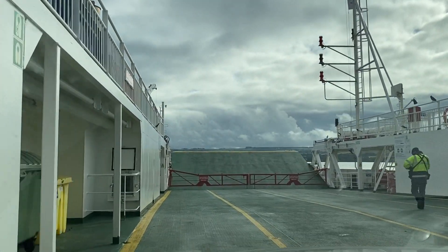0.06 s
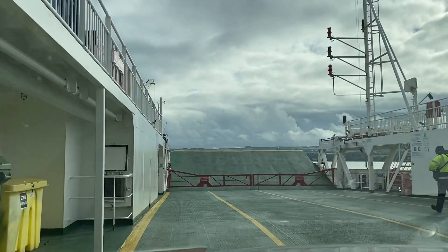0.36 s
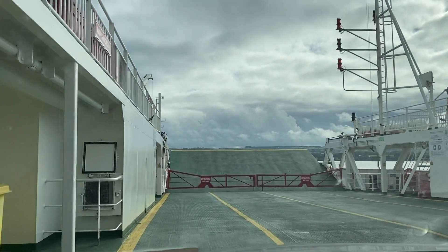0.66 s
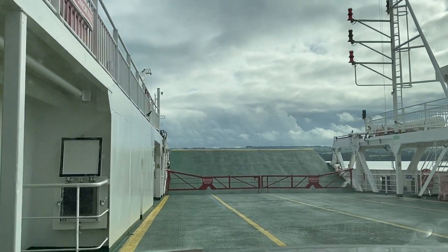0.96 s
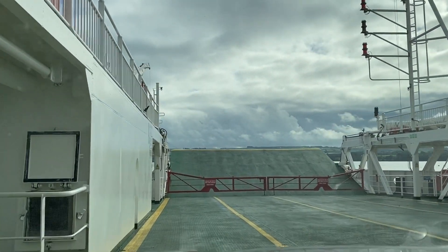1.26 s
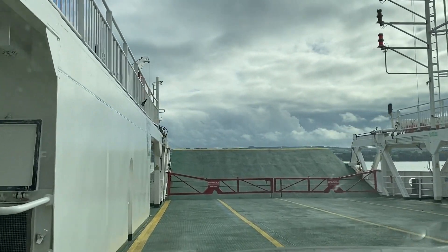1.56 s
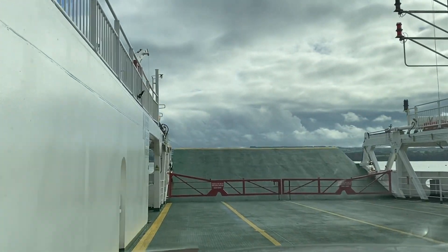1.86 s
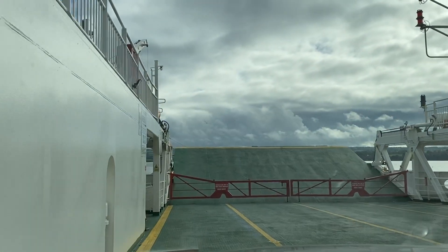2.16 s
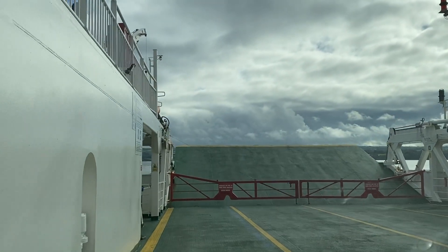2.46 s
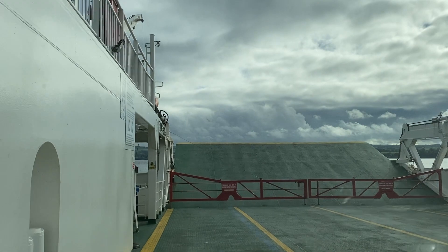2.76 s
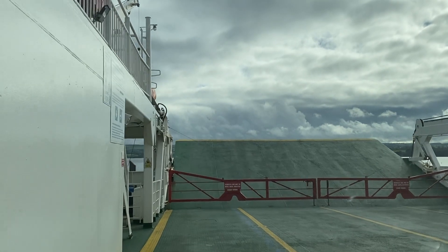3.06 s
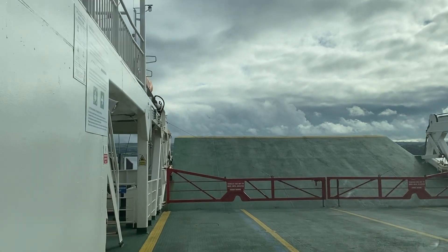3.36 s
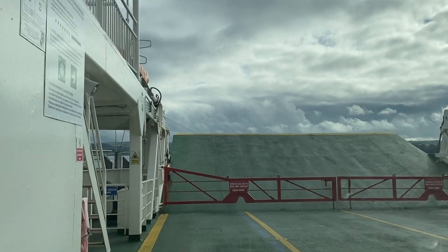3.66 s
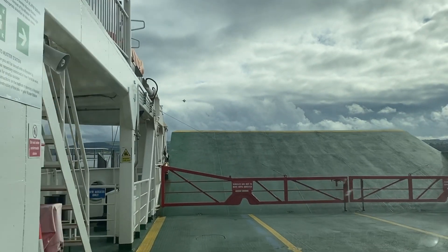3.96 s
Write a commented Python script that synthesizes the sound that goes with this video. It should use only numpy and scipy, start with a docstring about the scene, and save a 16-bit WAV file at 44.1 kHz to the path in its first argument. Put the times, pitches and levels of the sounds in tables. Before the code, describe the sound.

Deep ferry engine rumble heard inside a slowly rolling car, as a ventilator hums past.

```python
"""First comes a deep rumble and drone: a ferry's steel deck and diesels, heard inside a slowly rolling car.
The car's own engine sinks towards idle, under a soft hiss and a few faint notes that swell and fade.
A ventilator in the side wall draws near: its blade hum and rush of air swell, then drop away behind.
Something squeaks faintly twice, and the tyres thump softly over the plating."""
import sys
import numpy as np
from scipy.fft import rfft, irfft, next_fast_len
from scipy.io import wavfile
from scipy.ndimage import map_coordinates

SR = 44100
rng = np.random.default_rng(int(sys.argv[2]) if len(sys.argv) > 2 else 0)


def wav_out(sig):
    """Save sig, one row per channel (or a flat mono array), as 16-bit PCM at SR to the path in sys.argv[1]."""
    wavfile.write(sys.argv[1], SR, np.round(np.clip(np.atleast_2d(sig).T, -1, 1) * 32767).astype(np.int16))


N = 176400


def amp(db):
    """Turn decibels into a number to multiply by."""
    return 10 ** (np.asarray(db) / 20)


def unit(x):
    """Scale a signal to an average power of 1."""
    return x / np.sqrt(np.mean(x ** 2) + 1e-20)


def along(points, hz):
    """Read between (f/Hz, value) points, with octaves evenly spaced."""
    f, v = np.transpose(points)
    return np.interp(np.log(hz + 1), np.log(f + 1), v)


def clock():
    """The time of each sample in seconds."""
    return np.arange(N) / SR


def curves(rows):
    """Join timed rows with straight lines: one curve for each column after the time."""
    times, *columns = np.transpose(rows)
    return [np.interp(clock(), times, column) for column in columns]


def wobble(rate):
    """A smooth random curve through `rate` new values a second."""
    return map_coordinates(rng.standard_normal(256), [clock() * rate + 2], mode="wrap")


def tone(hz):
    """A pure note that follows a pitch curve."""
    return np.sqrt(2) * np.sin(2 * np.pi * (np.cumsum(hz) / SR + rng.random()))


def passing(at_s, before_s, after_s):
    """Sound weakens with distance: full at at_s, half power before_s earlier and after_s later."""
    t = clock() - at_s
    return 1 / np.hypot(1, t / np.where(t < 0, before_s, after_s))


def filtered(x, response):
    """Multiply each frequency in x by response(hz)."""
    size = next_fast_len(N + SR // 2)
    return irfft(rfft(x, size) * response(np.fft.rfftfreq(size, 1 / SR)), size)[..., :N]


# How alike the noise is on the left and right: f/Hz, likeness/0-1
LIKENESS = [(30, .99), (70, .95), (190, .95), (245, .64), (480, .78), (750, .64), (1200, .46), (2100, .47),
            (2600, .77), (7000, .82), (15000, .75)]
def noise(gain):
    """Stereo noise shaped by gain(hz): one part shared by both sides, one part opposite."""
    def shares(hz):
        angle = np.arccos(np.clip(along(LIKENESS, hz), -1, 1)) / 2
        return gain(hz) * np.array([np.cos(angle), np.sin(angle)])
    shared, opposite = filtered(rng.standard_normal((2, N)), shares)
    return np.sqrt(SR / 2) * np.array([shared + opposite, shared - opposite])


def rush(spectrum):
    """Steady noise from rows of f/Hz, level/dB; each level is for a slice 1 Hz wide."""
    return noise(lambda hz: amp(along(spectrum, hz)))


def swells(bands):
    """Bands of noise, each loudest at its own moment along the way."""
    out = np.zeros((2, N))
    for centre, width, db, at_s, fade_s in bands:
        band = unit(noise(lambda hz: 1 / (1 + ((hz - centre) / width) ** 2)))
        out += amp(db) * passing(at_s, fade_s, fade_s) * band
    return out


# The deck's deep rumble and the boom just above it: f/Hz, level/dB
RUMBLE_SPECTRUM = [(12, -79.5), (22, -66.5), (31, -46), (50, -42.5), (59, -40.5), (82, -40), (100, -51.5),
                   (140, -75.5), (250, -100), (500, -150)]
BOOM_SPECTRUM = [(50, -120), (100, -52), (125, -47.5), (145, -53.5), (168, -52), (205, -58), (250, -60),
                 (330, -77.5), (600, -110), (1000, -150)]
# How far each is turned up or down: t/s, gain/dB
RUMBLE_GAIN = [(0, -0.5), (.28, 2.5), (.5, 2), (.68, 3), (1.05, 0.5), (1.17, -7.5), (1.22, 0), (1.38, -4),
               (1.8, 1.5), (2.17, 1.5), (2.35, -3.5), (2.86, -1.5), (2.96, -2.5), (3.08, -4.5),
               (3.35, -6.5), (3.6, 0), (3.82, -9.5), (3.98, 1.5)]
BOOM_GAIN = [(0, -2), (.8, -2), (1.5, -0.5), (2.3, -1.5), (2.8, -0.5), (3.2, -2), (4, -2.5)]
def deck():
    """The steel deck rumbles and booms, and the tyres carry it up into the car."""
    rumble_db, = curves(RUMBLE_GAIN)
    boom_db, = curves(BOOM_GAIN)
    return amp(rumble_db) * rush(RUMBLE_SPECTRUM) + amp(boom_db) * rush(BOOM_SPECTRUM)


# The ship's engine notes: f/Hz, peak level/dB, peak t/s, time to half power/s, pitch wander/Hz
DIESEL_NOTES = [(27, -40, 1, 2.2, 0.8), (44.14, -26, 3.54, .8, 0.24), (63.2, -29, 0.29, 0.23, 1.5),
                (62.5, -28, 2.3, 0.14, 0.92), (79.3, -29, 1.3, 0.079, 0.69), (87.5, -24, 3.584, 0.11, 0.5),
                (121.8, -33.5, .15, 0.36, 2.44), (126.75, -39, 1.7, 1.2, 2.46)]
def diesels():
    """The ship's engines drone on low notes, each loudest at its own place along the deck."""
    return sum(amp(db) * passing(at_s, fade_s, fade_s) * tone(hz + wander * wobble(5.13))
               for hz, db, at_s, fade_s, wander in DIESEL_NOTES)


# The car's engine slowing down: t/s, firing f/Hz, level/dB
ENGINE_FIRING = [(0, 41.2, -22), (.5, 39.15, -28.5), (1.5, 37.7, -24), (2.2, 35.34, -27),
                 (2.7, 33.32, -27.5), (4, 32.97, -35)]
def car_engine():
    """The cylinders fire fast enough to make a low note, with a weaker one an octave up."""
    firing_hz, level_db = curves(ENGINE_FIRING)
    octave = amp(-11.5 + 2 * wobble(5)) * tone(2 * firing_hz)
    return amp(level_db) * (tone(firing_hz) + octave)


# The soft hiss in the car: f/Hz, level/dB
HISS_SPECTRUM = [(150, -74), (280, -65), (460, -73.5), (740, -74), (860, -77), (1100, -76.5), (1400, -85.5),
                 (1750, -81), (2100, -84.5), (2550, -86), (3200, -92.5), (4400, -95), (7000, -103),
                 (10000, -108), (16000, -115)]
# How far the hiss is turned up or down: t/s, gain/dB
HISS_GAIN = [(0, 2.5), (.1, -2), (.2, 1.1), (.45, 0.5), (.7, .3), (1.25, 1.5), (2.2, -4), (2.9, -2.5),
             (3.45, -2.5), (3.7, 0.2), (4, 0)]
# Narrow bands of noise: f/Hz, width/Hz, peak level/dB, peak t/s, time to half power/s
SWELLING_BANDS = [(167.8, 3.9, -37, 2.77, 0.66), (192, 48, -30, 2.3, .07), (229, 5.5, -42.5, 2.3, .7),
                  (272.6, 11, -41.5, 2.8, 0.3), (269, 6.9, -44, 1.08, 0.16), (402.1, 28, -47, 3.6, 0.38),
                  (412.8, 9, -45, 0.64, 0.13), (684, 30, -51.5, 3.26, 0.82)]
def hiss_and_swells():
    """Soft hiss, faint swelling notes, and a brief rough flutter around the fan's hum as it passes."""
    hiss_db, = curves(HISS_GAIN)
    return amp(hiss_db) * rush(HISS_SPECTRUM) + swells(SWELLING_BANDS)


# The hum of the fan blades: t/s, f/Hz, level/dB (before trim_db)
BLADE_HUM = [(0, 188.9, -41), (.33, 189, -32), (.63, 188.6, -29), (.72, 188.8, -40), (.88, 188.8, -25.5),
             (1.05, 187.7, -32.5), (1.11, 189.5, -36), (1.3, 187.8, -31), (1.68, 188, -22.5),
             (1.89, 188.3, -30), (1.99, 187.6, -20), (2.15, 187.6, -25), (2.29, 186.3, -16.5),
             (2.57, 185.2, -28), (2.64, 185.6, -21), (2.73, 183, -28.5), (2.84, 184.2, -27.5),
             (2.98, 184.8, -32.5), (3.12, 184, -27), (3.21, 185, -40.5), (3.38, 186.8, -23.5),
             (3.6, 184.3, -43.5), (4, 183.2, -36)]
# Higher notes heard close to the grille: multiple of the hum's pitch, peak level/dB
BLADE_OVERTONES = [(2, -46), (3, -38)]
def ventilator_hum(trim_db=-2, waver_db=1):
    """The blades hum; the car rolls through loud and quiet spots (standing waves) along the wall."""
    pitch, level_db = curves(BLADE_HUM)
    hum = amp(level_db + trim_db + waver_db * wobble(18)) * tone(pitch)
    overtones = sum(amp(db + 1.4 * wobble(6.84)) * tone(multiple * pitch + 3 * wobble(25))
                    for multiple, db in BLADE_OVERTONES)
    return hum + passing(at_s=2.08, before_s=.1, after_s=.1) ** 2 * overtones


# The duct's low roar and the air's high hiss: f/Hz, level/dB
DUCT_SPECTRUM = [(40, -150), (90, -85), (150, -58.5), (210, -63.5), (310, -66.5), (360, -58), (440, -65.5),
                 (540, -65.5), (780, -67.5), (1100, -70), (1500, -82), (2500, -110), (4000, -150)]
AIR_SPECTRUM = [(300, -150), (700, -100), (1400, -78), (2000, -72), (2550, -76.5), (3200, -80), (4000, -84),
                (5500, -89), (7200, -93), (10500, -99.5), (16000, -107)]
# Hiss the grille throws different ways: f/Hz, width/Hz, peak level/dB, peak t/s, time to half power/s
GRILLE_BEAMS = [(1740, 170, -53, 1.27, 0.3), (2650, 600, -50.5, 2.26, 0.088), (2400, 450, -52, 1.9, .15)]
def ventilator_air(flutter_db=.35):
    """Rushing air swells as the car nears the grille, then fades fast as the wall hides it."""
    roar = passing(at_s=2.23, before_s=.54, after_s=.22) * rush(DUCT_SPECTRUM)
    hiss = passing(at_s=2.223, before_s=.43, after_s=.2) * rush(AIR_SPECTRUM)
    hiss += swells(GRILLE_BEAMS)
    return roar + amp(flutter_db * wobble(11.78)) * hiss


# Two squeaks: t/s, half length/s, peak level/dB
SQUEAK_MOMENTS = [(0.3, .05, -68), (1.5, .02, -76)]
def squeaks(pitch_hz=12420, width_hz=130):
    """Faint, very high squeaks, probably from a dragging brake."""
    band = unit(noise(lambda hz: np.exp(-((hz - pitch_hz) / width_hz) ** 2)))
    loudness = sum(amp(db) * np.exp(-((clock() - at_s) / half_s) ** 2)
                   for at_s, half_s, db in SQUEAK_MOMENTS)
    return loudness * band


# Thuds from bumps in the deck: t/s, peak level/dB, f/Hz
DECK_BUMPS = [(1.192, -18.5, 78.4), (1.236, -11, 65.3), (1.474, -14, 55.3), (2.14, -19, 75.8),
              (2.939, -15.5, 64), (3.955, -14.5, 80)]
def tyre_thumps(rise_s=.012):
    """Each bump under the tyres gives the car's body a few soft, low shakes."""
    out = np.zeros(N)
    for start_s, db, hz in DECK_BUMPS:
        t = np.maximum(clock() - start_s, 0)
        rise_and_fade = t / rise_s * np.exp(1 - t / rise_s)
        out += amp(db) * rise_and_fade * np.sin(2 * np.pi * hz * t)
    return out


# Pitches made louder or softer by sound bouncing between the windows: f/Hz, width/Hz, gain/dB
WINDOW_COLOUR = [(456.5, 16, 4.5), (516, 26, 3), (599, 6.3, -1), (810, 11, 2.5), (920, 13, -1),
                 (960, 18, -4), (1150, 5.7, -8), (1200, 75, 0), (1426, 36, 3), (1428, 17, -3),
                 (1716, 120, 2), (2006, 60, -2.5), (2980, 110, -2), (3025, 26, 6), (3300, 28, 2.5),
                 (4240, 180, -2)]
def scene():
    """All the sounds together, coloured by the cabin as heard behind the windscreen."""
    def colour(hz):
        return amp(sum(db * np.exp(-((hz - centre) / width) ** 2)
                       for centre, width, db in WINDOW_COLOUR))
    ventilator = ventilator_hum() + ventilator_air()
    mix = deck() + diesels() + car_engine() + hiss_and_swells() + ventilator + squeaks() + tyre_thumps()
    return filtered(mix, colour)


# How much louder the left side is than the right: f/Hz, gain/dB
LEFT_GAIN = [(60, 0.5), (200, -.5), (400, 1), (600, 4.5), (720, 2), (1150, -1), (1400, -3.5), (2300, -0.7),
             (3200, 3.5), (5200, 2), (7000, 0)]
# How far the left wave runs ahead of the right: f/Hz, phase/radians
LEFT_LEAD = [(30, -.15), (60, -.22), (110, -.1), (200, .4), (300, .8), (400, 1.7), (700, 2.0), (1000, 2.35),
             (1650, 2.6), (2400, 6.2), (3000, 7), (4500, 6.45), (5300, 6.7), (7000, 6.2), (11000, 0),
             (15000, -6.2)]
def record(dry, top_hz=15750):
    """Stereo spread: left and right differ in level and timing at each pitch, up to a cut at top_hz."""
    sides = np.array([[.5], [-.5]])  # left, right
    def spread(hz):
        balance = amp(sides * along(LEFT_GAIN, hz))
        timing = np.exp(1j * sides * along(LEFT_LEAD, hz))
        return balance * timing * (hz < top_hz)
    return filtered(dry, spread)


dry = scene()
out = record(dry)
wav_out(out)
```